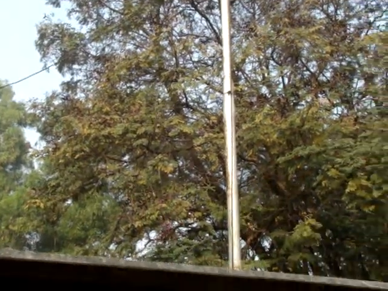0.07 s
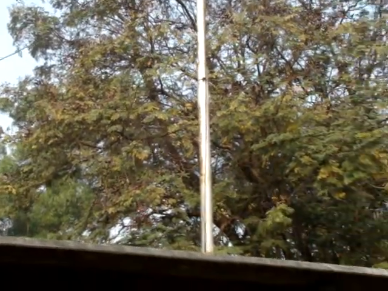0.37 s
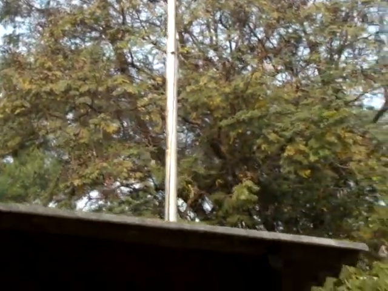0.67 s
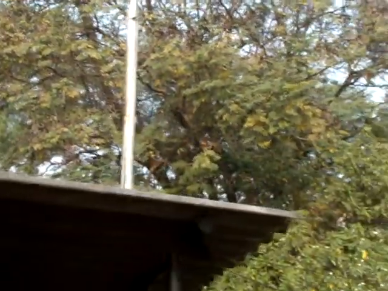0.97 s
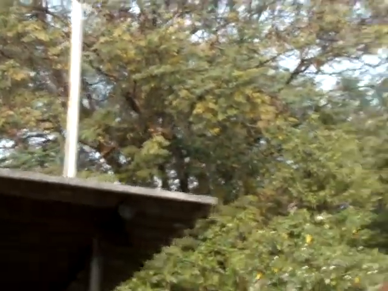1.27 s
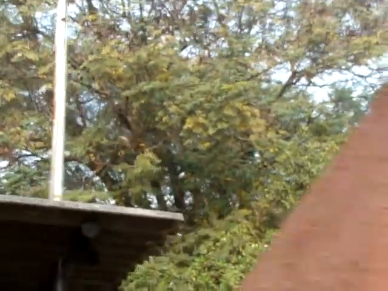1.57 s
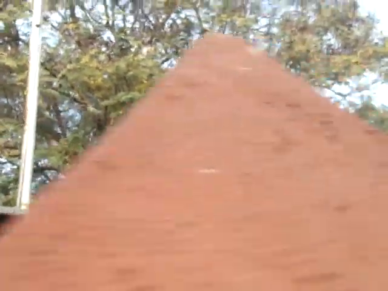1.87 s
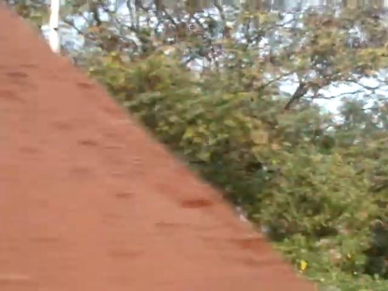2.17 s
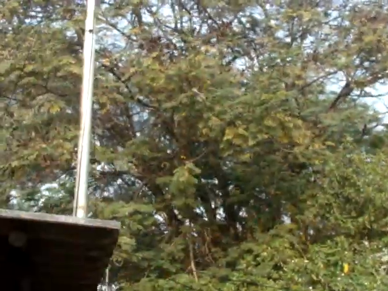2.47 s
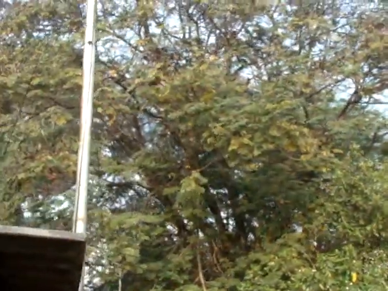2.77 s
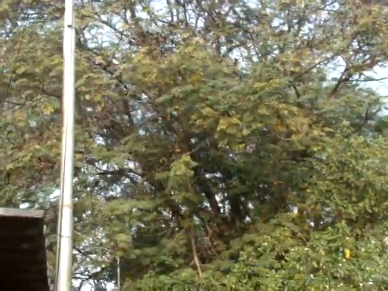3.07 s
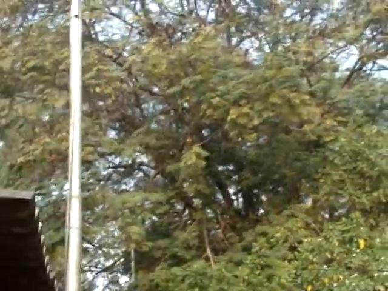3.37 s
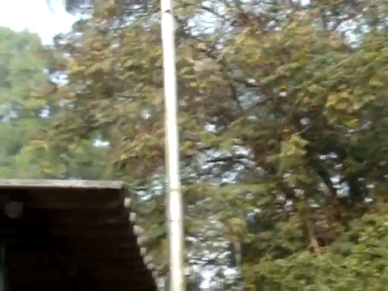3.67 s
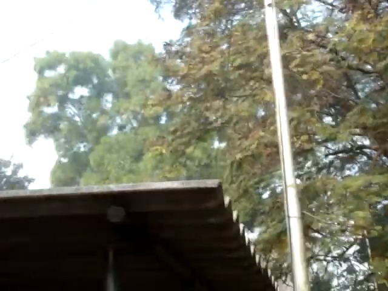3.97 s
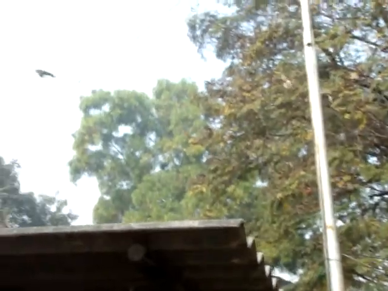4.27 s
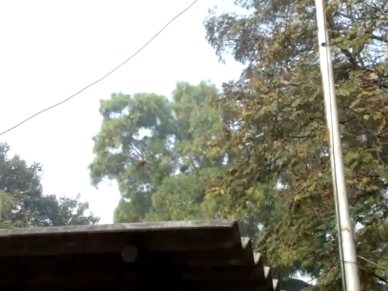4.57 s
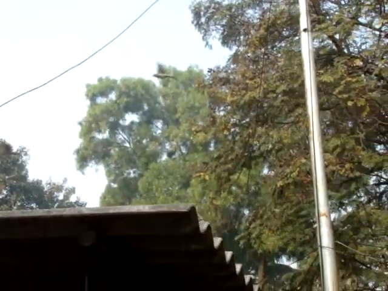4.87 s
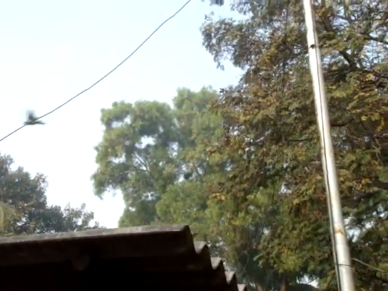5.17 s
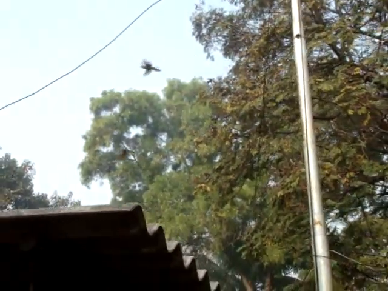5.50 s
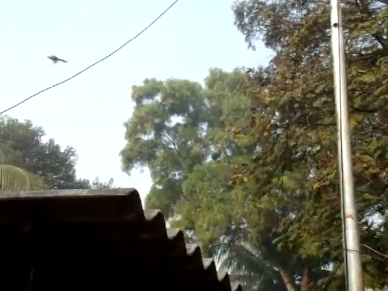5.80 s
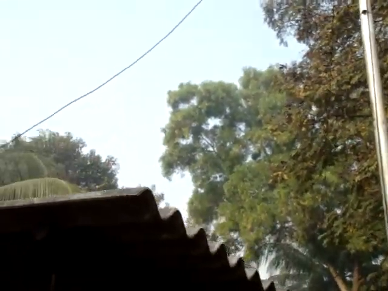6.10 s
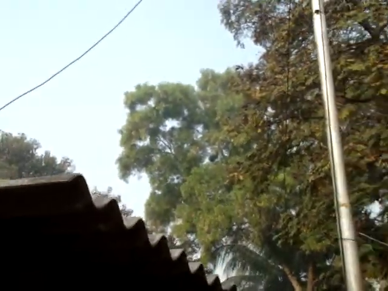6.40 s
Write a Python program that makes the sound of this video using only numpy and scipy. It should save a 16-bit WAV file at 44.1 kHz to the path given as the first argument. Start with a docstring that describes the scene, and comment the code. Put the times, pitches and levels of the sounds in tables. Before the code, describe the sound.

A flock of birds squabbles in the trees beside a house, their harsh, buzzy squawks overlapping in quick bouts while a few nearer calls stand out. Beneath them lie a low outdoor rumble, a faint distant motor hum and, at the very start, a brief faint whistle. From about halfway, a hand knocks and scuffs a few times on the camera that holds the single microphone, while the birds keep chattering.

```python
"""Harsh squawks burst from a flock of babblers squabbling in quick bouts in the trees beside a house.
Each is a buzzy pulse train, arching in pitch and filtered by the throat; a wall reflects it and the
foliage scatters it. Beneath lie outdoor rumble, a faint far hum and, at the start, a brief whistle.
Later a hand knocks a few times on the camera that holds the one microphone, exciting its case modes."""
import sys
import numpy as np
from scipy import signal
from scipy.fft import rfft, irfft, next_fast_len
from scipy.io import wavfile
from scipy.ndimage import uniform_filter1d

SR = 44100
rng = np.random.default_rng(int(sys.argv[2]) if len(sys.argv) > 2 else 0)


def master_out(mix):
    """Clip the mix to full scale and print it as 16-bit PCM to the path in sys.argv[1]."""
    frames = np.transpose(np.atleast_2d(mix))
    ceiling = np.clip(frames, -1, 1)
    pcm = np.round(ceiling * 32767).astype(np.int16)
    wavfile.write(sys.argv[1], SR, pcm)


N = 288414
T = np.arange(N) / SR


def undb(db):
    """Amplitude ratio of a level in decibels."""
    return 10 ** (np.asarray(db) / 20)


def unit(x):
    """Normalisation to an rms of 1."""
    return x / np.sqrt(np.mean(x ** 2) + 1e-18)


def curves(table):
    """Linear interpolation of a time table's columns at every sample."""
    times, *columns = np.transpose(table)
    return [np.interp(T, times, column) for column in columns]


def shape(x, response):
    """Linear filtering: the spectrum is multiplied by a frequency response."""
    size = next_fast_len(len(x) + 4096)
    f = np.maximum(np.fft.rfftfreq(size, 1 / SR), 1)
    return irfft(rfft(x, size) * response(f), size)[:len(x)]


def colour(x, points):
    """Spectral weighting by (f/Hz, gain/dB) points, conserving the power of white noise."""
    hz, db = np.transpose(points)
    return shape(x, lambda f: unit(undb(np.interp(np.log(f), np.log(hz), db))))


def wander(t, rate):
    """Random modulation: Gaussian values, rate a second, joined by straight lines."""
    return np.interp((t - t[0]) * rate, np.arange(2048), rng.standard_normal(2048))


def add(track, start_s, sound):
    """Superposition of a sound on a track from start_s on."""
    start = int(start_s * SR)
    a, b = max(start, 0), min(start + len(sound), N)
    if b > a:
        track[a:b] += sound[a - start:b - start]


def add_squawk(track, crest_s, crest_hz, rise_s, fall_s, db, rough, beak_harmonic, buzz_db, upper_db):
    """Pressure-driven oscillation: one push of air arches the syrinx's pitch and level; a wall echoes."""
    foot_hz, harmonics = 606.2, 17
    t = np.arange(-int(2.2 * rise_s * SR), int(2.01 * fall_s * SR)) / SR
    push = np.exp(-(t / np.where(t < 0, rise_s, fall_s)) ** 2)
    jitter = rough * (0.0489 * wander(t, 600) + 0.02516 * wander(t, 89.9)) + 0.00802 * wander(t, 70.16)
    hz = (foot_hz + (crest_hz - foot_hz) * push) * (1 + jitter)
    phase = 2 * np.pi * np.cumsum(hz) / SR
    # closed-form sum of equal harmonics
    pulses = unit(np.sin((harmonics + .5) * phase) / (2 * np.sin(phase / 2) + 1e-12) - .5)
    # the beak rings with one harmonic and its upper neighbour, each swelling and fading on its own
    ring = sum(undb(partial_db + 3.5 * wander(t, 35)) * np.cos((beak_harmonic + k) * phase)
               for k, partial_db in enumerate((0, upper_db)))
    hiss = rng.standard_normal(len(t)) * (1 + np.cos(phase))
    shimmer = 1 + .9 * rough * wander(t, 350)
    voice = unit((undb(buzz_db) * pulses + .6 * ring) * shimmer + .8 * rough * hiss)
    call = voice * push ** 0.56 * signal.windows.tukey(len(t), .2) * undb(db)
    add(track, crest_s + t[0], call)
    echo_s, echo_db = .044 * rng.uniform(.85, 1.15), -5.5  # each perch has its own path via the wall
    add(track, crest_s + t[0] + echo_s, call * undb(echo_db))


# Frequency response of the birds' vocal tract: f/Hz, relative gain/dB
VOCAL_TRACT = [(710, -46), (1200, -18.5), (1540, -15), (1740, -5), (2170, -2.5), (2420, -3), (3170, -7),
               (4080, 0.5), (4340, -1), (4970, -7.5), (6110, -2.5), (8080, -17), (8600, -16.5),
               (9580, -8.5), (10300, -26), (13400, -56), (22000, -120)]


def throat(voices):
    """Source-filter principle: the vocal tract imposes its formants on the pulses of the syrinx."""
    return colour(voices, VOCAL_TRACT)


def sharpen(voices, shrill_db, corner_hz=5000):
    """Vocal effort sets spectral balance: a shelf shifts the upper harmonics by shrill_db."""
    treble = shape(voices, lambda f: 1 / (1 + (corner_hz / f) ** 8))
    return voices + treble * (undb(shrill_db) - 1)


def foliage(x, t60_s, onset_s):
    """Multiple scattering: reflections from leaves and trunks merge into an exponential tail."""
    t = T[:SR]
    tail = rng.standard_normal(SR) * np.exp(-np.log(1000) * t / t60_s) * (1 - np.exp(-t / onset_s))
    return signal.fftconvolve(x, tail / np.sqrt(np.sum(tail ** 2)))[:N]


# Near calls: crest t/s, crest f/Hz, rise t/s, relative level/dB, roughness (0-1), beak harmonic number
NEAR_SQUAWKS = [(0.02, 1010, .05, -27, .25, 4), (0.34, 819, .045, -28.5, .25, 3),
                (0.45, 1000, .06, -28, .3, 4), (0.69, 1102, .11, -29, .3, 4), (1.22, 835, .07, -29, .2, 3),
                (1.37, 850, .08, -30, .2, 3), (1.5, 758, .07, -27.5, .15, 3),
                (1.64, 1080, .08, -28, .35, 6), (2.02, 1118, .08, -29, .3, 4),
                (2.49, 1101, .135, -25, .06, 4), (2.675, 863, .05, -28, .04, 3),
                (2.86, 830, .1, -26.5, .08, 3), (2.865, 1140, .09, -28, .1, 4),
                (3.0, 900, .05, -30, .05, 3), (3.089, 930, .041, -29, .03, 3),
                (3.289, 1063, .049, -28, .15, 4), (3.36, 930, .04, -29, .08, 3),
                (3.51, 1016, .06, -27, .25, 6), (3.671, 900, .056, -29.5, .05, 3),
                (3.8, 850, .06, -29.5, .08, 3), (3.963, 987, .1, -27, .06, 3),
                (4.11, 1110, .07, -28, .1, 4), (4.3, 978, .056, -27, .06, 4),
                (4.648, 1070, .048, -24, .02, 3), (4.705, 905, .035, -26.5, .02, 3),
                (4.876, 1014, .048, -29, .06, 3), (5.069, 1073, .047, -22, .02, 3),
                (5.125, 870, .035, -27, .02, 3), (5.355, 1004, .08, -30, .1, 4),
                (5.503, 1070, .055, -25.5, .07, 3), (5.955, 1050, .075, -30, .08, 3),
                (6.11, 1040, .07, -29, .1, 3), (6.34, 730, .06, -30, .25, 3)]


def near_birds(shrill_db, fall_s=.058, leaves_db=-14, gain_db=.7):
    """Direct sound dominates close to a source: the nearest birds stand out with little scatter."""
    voices = np.zeros(N)
    for crest_s, crest_hz, rise_s, db, rough, beak_harmonic in NEAR_SQUAWKS:
        add_squawk(voices, crest_s, crest_hz, rise_s, fall_s, db, rough, beak_harmonic,
                   buzz_db=2.5, upper_db=-11)
    voices = sharpen(throat(voices), shrill_db)
    return undb(gain_db) * (voices + undb(leaves_db) * foliage(voices, t60_s=0.09, onset_s=0.0016))


def tree_of_birds(calls=60, leaves_db=-6):
    """Independent sources: one tree's birds call at random, clear or rasping, and its leaves scatter."""
    voices = np.zeros(N)
    for k, (when, pitch, rise, fall, softness, rasp, beak) in enumerate(rng.random((calls, 7))):
        crest_s = (k + when) / calls * (N / SR + .4) - .2
        add_squawk(voices, crest_s, crest_hz=740 + 400 * pitch, rise_s=.03 + .045 * rise,
                   fall_s=.03 + .05 * fall, db=-6 * softness, rough=.08 + .6 * rasp ** 2,
                   beak_harmonic=3 + int(4 * beak ** 2), buzz_db=6.5, upper_db=-8)
    return voices + undb(leaves_db) * foliage(voices, t60_s=0.19, onset_s=0.008)


# Continuous chatter of the flock: t/s, relative level/dB, treble gain/dB
FLOCK_CHATTER = [(0, -20.5, -2.5), (1.8, -21, -2), (3.8, -23.5, -1), (4.55, -25, -0.5), (4.85, -22.5, -3),
                 (5.4, -28, -1.5), (5.78, -29.5, 1), (6.2, -25.5, -7.5), (6.54, -24, -5.5)]
# Flare-ups of the squabble: start t/s, duration t/s, relative level/dB, treble gain/dB
FLOCK_BOUTS = [(-0.02, 0.34, -22, -0.5), (0.323, 0.12, -31, 8), (0.538, 0.45, -22, -2),
               (1.044, 0.34, -27, 3), (1.49, 0.24, -25, .5), (1.81, .3, -23, 0), (2.164, 0.25, -22.5, .5),
               (2.527, 0.083, -23, -4), (2.76, 0.2, -26.5, -2), (3.12, 0.32, -22, -2),
               (3.425, 0.2, -22, -1.5), (3.954, 0.41, -21, -3), (4.407, 0.067, -25, 0),
               (4.57, 0.18, -34, 6), (4.887, 0.11, -19.5, -1.5), (5.117, 0.11, -25.5, -1.5),
               (5.22, 0.45, -20, -5), (5.512, 0.14, -20, 0.5), (5.659, 0.079, -23.5, 2),
               (5.82, 0.17, -24.5, -8.5), (5.99, 0.12, -20, -5.5), (6.248, .16, -23, -9),
               (6.44, .14, -28, -14)]


def excitement(attack_s=0.029, release_s=0.014):
    """Incoherent sources add in power: chatter plus bouts give the flock's level and treble gain in dB."""
    db, shrill_db = curves(FLOCK_CHATTER)
    power, treble_power = undb(db) ** 2, undb(db + shrill_db) ** 2
    for start_s, length_s, db, shrill_db in FLOCK_BOUTS:
        age = T - start_s
        swell = np.clip(age / attack_s, 0, 1) * np.exp(-np.maximum(age - length_s, 0) / release_s)
        power += (swell * undb(db)) ** 2
        treble_power += (swell * undb(db + shrill_db)) ** 2
    return 10 * np.log10(power), 10 * np.log10(treble_power / power)


def flock(loud_db, shrill_db, trees=3, gain_db=1.0):
    """Amplitude modulation: the chorus of several trees, evened out, follows the birds' excitement."""
    voices = throat(sum(tree_of_birds() for _ in range(trees)))
    running_rms = np.sqrt(uniform_filter1d(voices ** 2, SR // 8) + 1e-12)
    return sharpen(voices, shrill_db) / running_rms * undb(loud_db + gain_db)


# Envelope of the outdoor rumble: t/s, relative level/dB
RUMBLE_ENVELOPE = [(0, -38.5), (.8, -37.5), (2.2, -39.5), (3.25, -36.5), (3.6, -42), (4.1, -38.5),
                   (5.5, -35), (6.54, -37.5)]
# Spectrum of the outdoor rumble: f/Hz, relative level/dB
RUMBLE_SPECTRUM = [(15, -72), (25, -32.5), (209, -8.5), (281, -1.5), (346, -3.5), (563, 0.5), (744, 0.5),
                   (933, 2.5), (1040, -0.5), (1320, 3.5), (1600, -2), (2080, -4), (3520, -120)]


def rumble(gain_db=2, waver_db=1.87):
    """Band-limited noise from far traffic and moving air, fluctuating in level."""
    db, = curves(RUMBLE_ENVELOPE)
    noise = unit(colour(rng.standard_normal(N), RUMBLE_SPECTRUM))
    return noise * undb(db + gain_db + waver_db * wander(T, 9))


def far_tone(table, harmonics_db, waver):
    """Scattered sound dominates far from a source: a wavering tone is blurred by the trees."""
    hz, db = curves(table)
    phase = 2 * np.pi * np.cumsum(hz * (1 + waver * wander(T, 60))) / SR
    partials = sum(undb(level) * np.sin(k * phase) for k, level in enumerate(harmonics_db, 1))
    tone = unit(partials) * undb(db)
    return 0.34 * tone + 0.79 * foliage(tone, t60_s=0.23, onset_s=0.0066)


# Course of a distant motor's hum: t/s, fundamental f/Hz, relative level/dB
MOTOR_HUM = [(0, 328, -47), (.2, 342, -36.5), (.33, 358, -39.5), (.55, 352, -37), (.72, 274, -34),
             (.9, 280, -43.5), (1.5, 293, -44.5), (2.8, 285, -50), (3.6, 290, -53), (3.9, 357.5, -39.5),
             (4.8, 370, -41), (5.2, 365, -48), (6.54, 360, -71)]


def motor_hum():
    """Periodic motion gives a harmonic series, here with the second harmonic strongest."""
    return far_tone(MOTOR_HUM, harmonics_db=(-9.5, 7.5, -15, 4), waver=0.0355)


# Course of a faint far whistle: t/s, f/Hz, relative level/dB
FAR_WHISTLE = [(0, 935, -48), (.1, 925, -36.5), (.28, 930, -40), (.4, 920, -84)]


def whistle():
    """Simple harmonic oscillation: a single partial with slight frequency modulation."""
    return far_tone(FAR_WHISTLE, harmonics_db=(0,), waver=0.0059)


def resonance(f, hz, width_hz):
    """Response of a damped oscillator, with gain 1 at its natural frequency."""
    return 1 / (1 + 1j * (f * f - hz * hz) / (f * width_hz))


# Modes of the camera case: f/Hz, bandwidth/Hz, relative gain/dB
CASE_MODES = [(300, 120, -20), (544, 470, 1), (763, 170, -0.5), (1000, 300, -9), (1116, 140, 4.5)]
# Touches of the hand: t/s, relative level/dB, attack t/s, decay t/s, centre f/Hz
HAND_BUMPS = [(3.395, -24.5, 0.0015, 0.0087, 700), (3.444, -27.5, 0.0012, 0.0038, 500),
              (4.14, -25, 0.0085, 0.067, 746), (4.195, -22.5, 0.004, 0.055, 504),
              (4.43, -17, 0.0064, 0.037, 950), (4.485, -30.5, 0.0032, 0.12, 520),
              (4.61, -32.5, 0.0088, 0.05, 400), (4.865, -30, 0.0028, 0.066, 490),
              (5.716, -20.5, 0.00083, 0.0047, 476)]


def case_response(f):
    """Modal superposition: the case responds as the sum of its resonances."""
    return sum(undb(db) * resonance(f, hz, width_hz) for hz, width_hz, db in CASE_MODES)


def handling():
    """Forced vibration: fingers knock and scuff the case, each touch favouring some of its modes."""
    bumps, t = np.zeros(N), T[:SR // 2]
    for start_s, db, attack_s, decay_s, centre_hz in HAND_BUMPS:
        force = np.minimum(t / attack_s, 1) * np.exp(-np.maximum(t - attack_s, 0) / decay_s)
        scuff = force * rng.standard_normal(len(t))
        knock = shape(scuff, lambda f: case_response(f) * resonance(f, centre_hz, 0.67 * centre_hz))
        force_rms = np.sqrt(np.mean(force ** 2))
        add(bumps, start_s, unit(knock) * force_rms * undb(db))
    return bumps


def scene():
    """Superposition: all sound pressures add at one microphone, which feeds both channels."""
    loud_db, shrill_db = excitement()
    birds = near_birds(shrill_db) + flock(loud_db, shrill_db)
    return np.tile(birds + rumble() + motor_hum() + whistle() + handling(), (2, 1))


def record(dry):
    """Band limiting: the camera's steep low-pass filter removes the top octave."""
    cutoff_hz = 10150
    return signal.sosfilt(signal.ellip(12, .2, 80, cutoff_hz, fs=SR, output="sos"), dry)


dry = scene()
out = record(dry)
master_out(out)
```